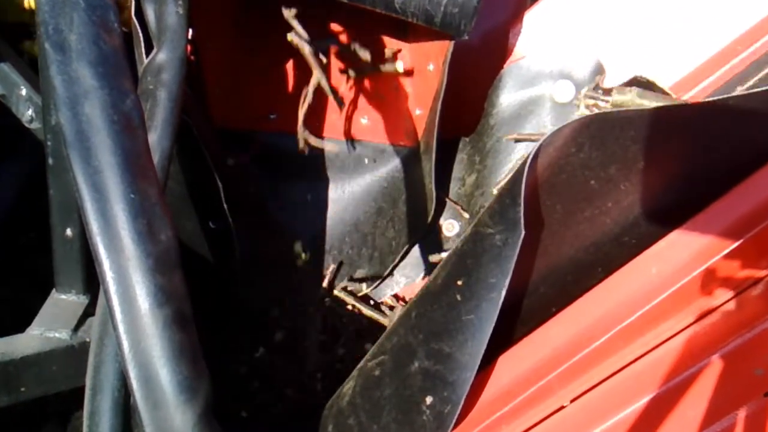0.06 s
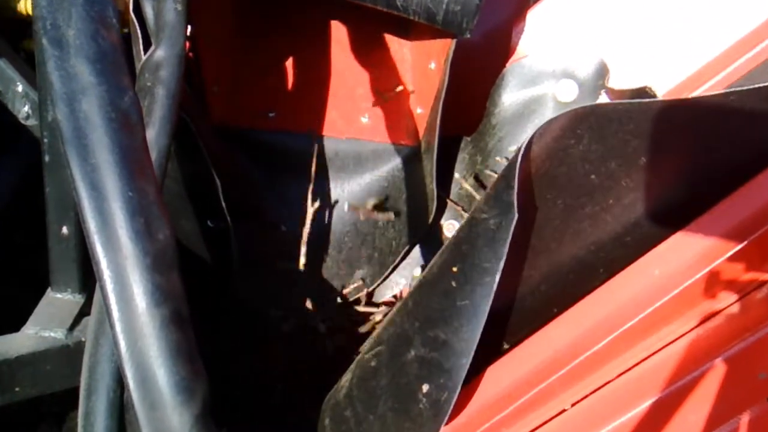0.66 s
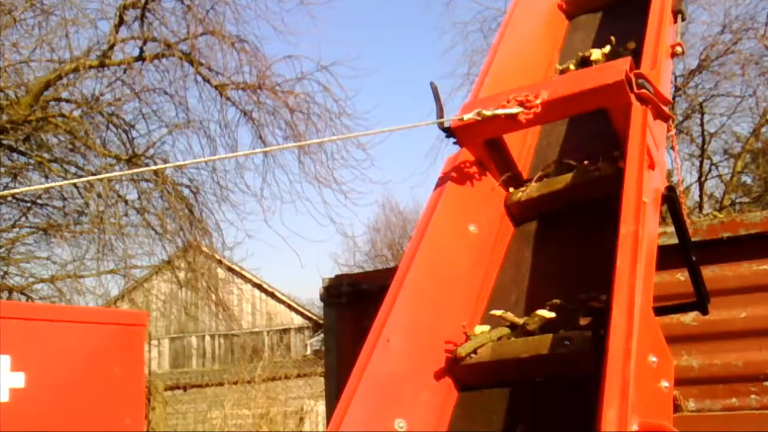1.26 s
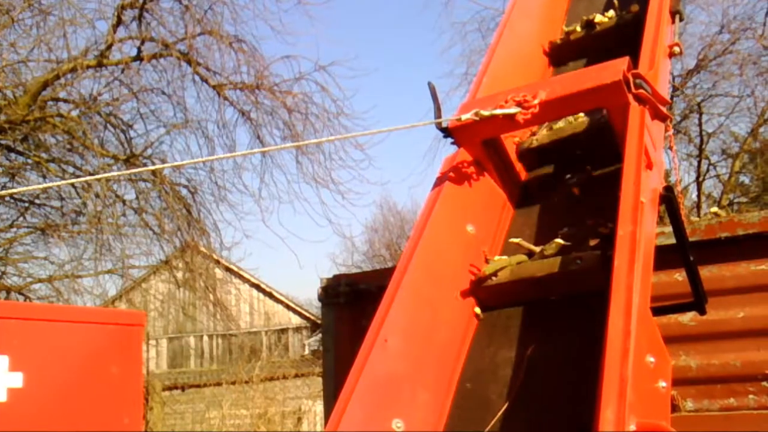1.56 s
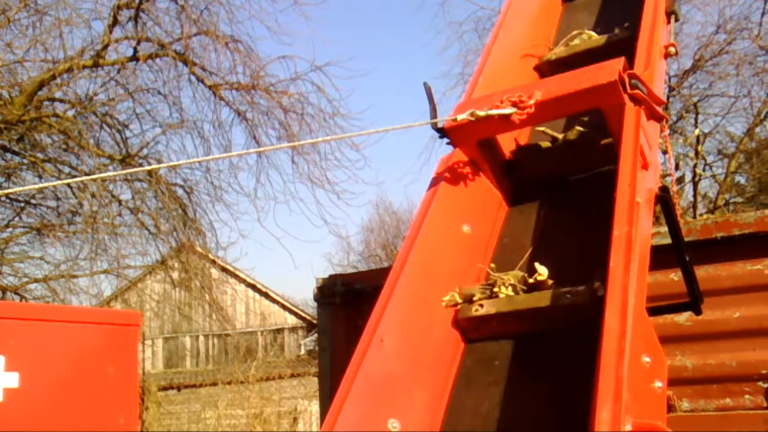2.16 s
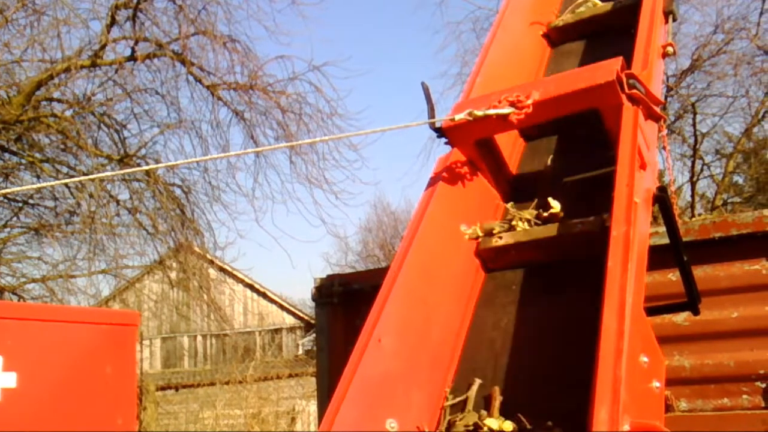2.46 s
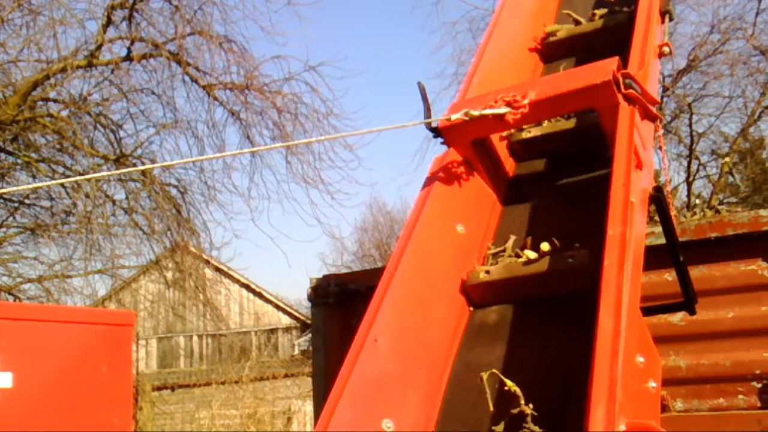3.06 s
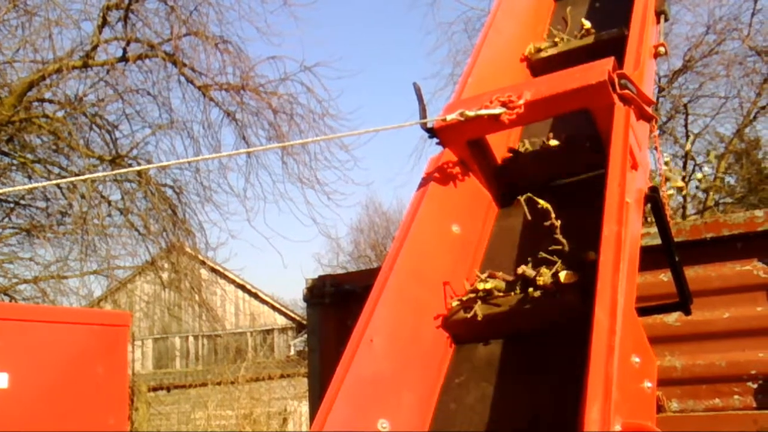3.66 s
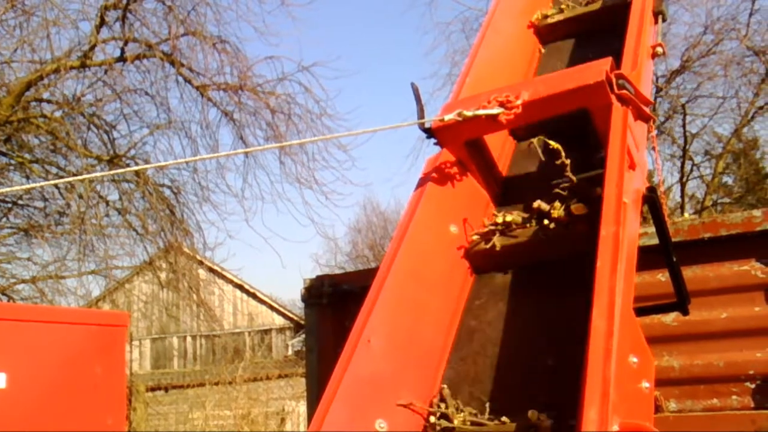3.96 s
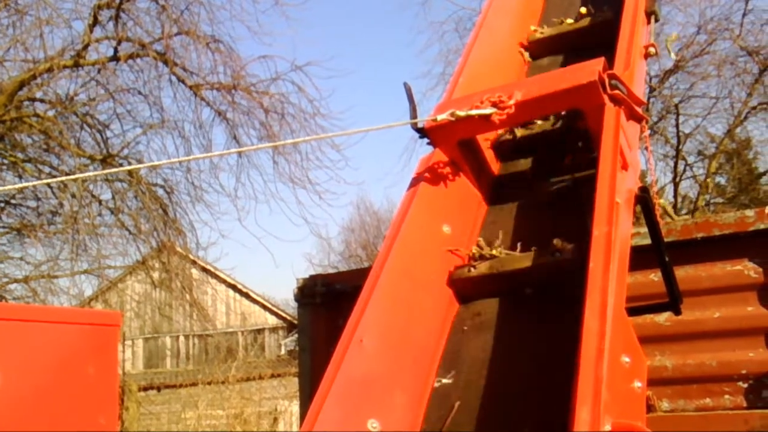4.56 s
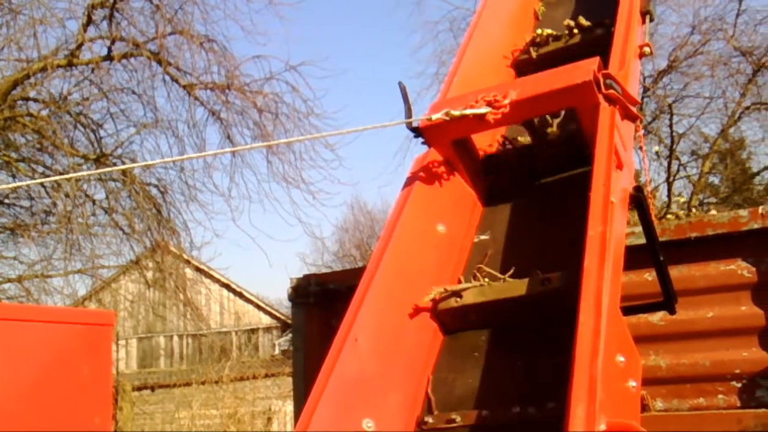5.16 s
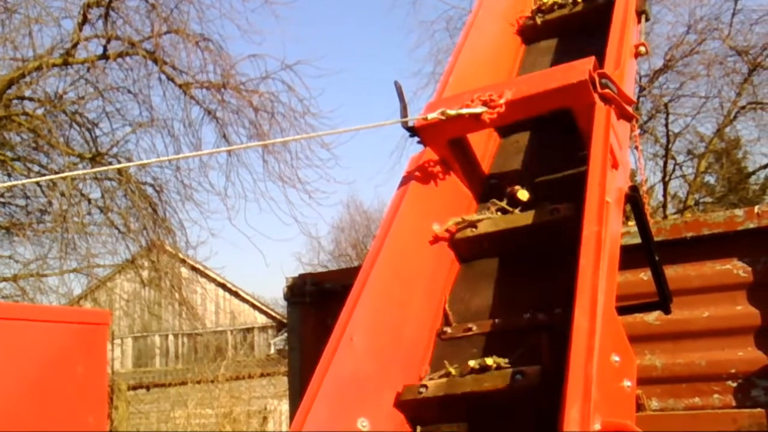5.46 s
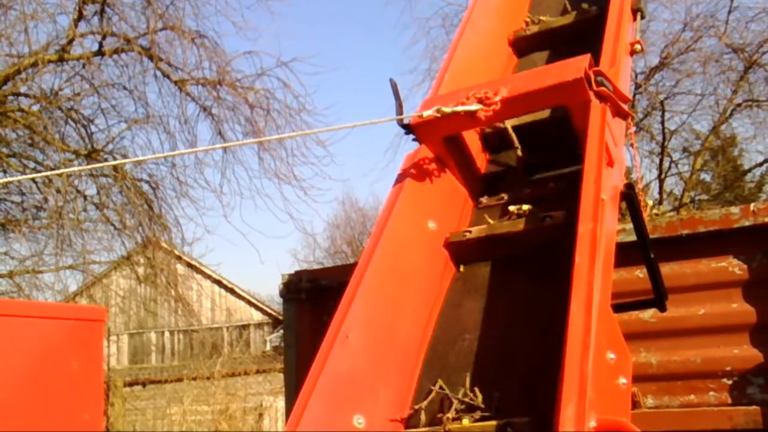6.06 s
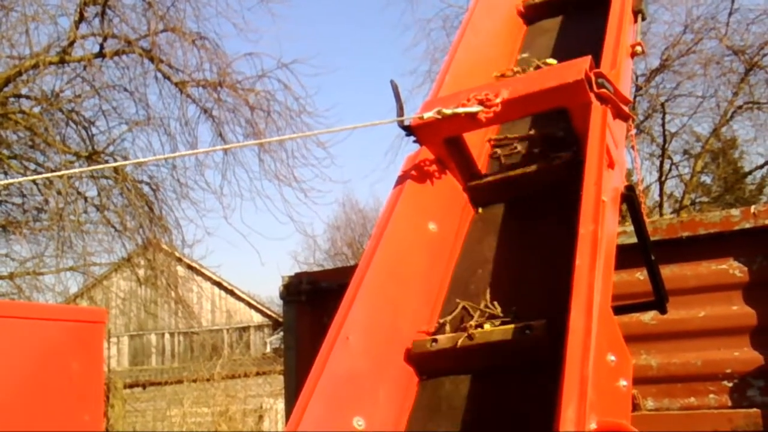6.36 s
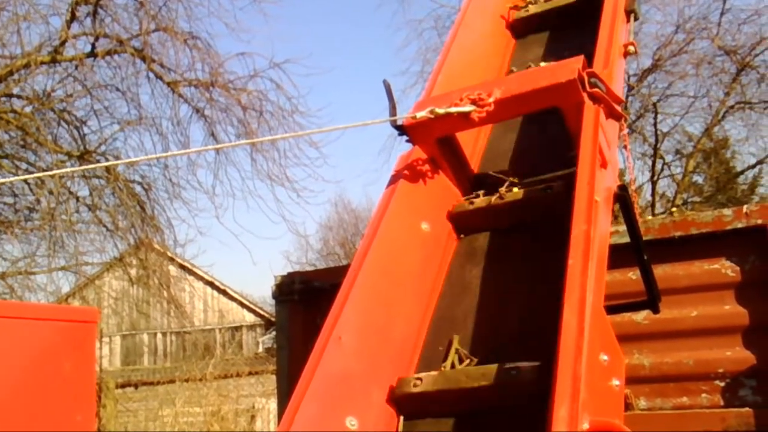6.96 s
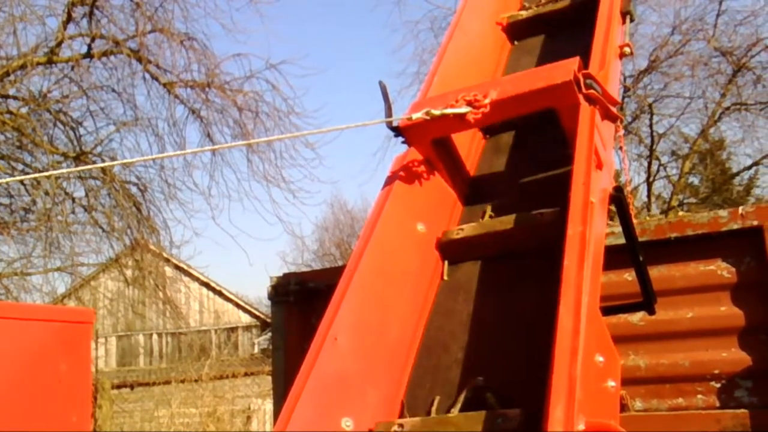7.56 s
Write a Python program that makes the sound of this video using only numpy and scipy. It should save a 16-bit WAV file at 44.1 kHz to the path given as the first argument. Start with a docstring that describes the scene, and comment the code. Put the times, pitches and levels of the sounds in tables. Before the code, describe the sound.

A diesel wood chipper chops branches with fast crunching clanks, cuts out, then fades back in with a rattling conveyor.

```python
"""A tractor's four-cylinder diesel drives a drum chipper that chops branches into billets (short logs).
For the first second we stand at the outlet. Six times a second the wood crunches, the steel cutter
clanks and billets tumble down a chute, over the drone of the engine. The sound drops out for a moment,
then fades in over about five seconds beside the rattling conveyor, where the chopping goes on.
All along, a limiter turns everything down at loud clanks, so the drone dips with them."""
import sys
import numpy as np
from scipy import signal
from scipy.fft import rfft, irfft
from scipy.io import wavfile
from scipy.ndimage import uniform_filter1d

SR = 44100
rng = np.random.default_rng(int(sys.argv[2]) if len(sys.argv) > 2 else 0)


def to_wav(s):
    """Save 16-bit WAV."""
    ch = np.atleast_2d(s).T  # columns
    pcm = np.round(np.clip(ch, -1, 1) * 32767)  # PCM
    wavfile.write(sys.argv[1], SR, pcm.astype(np.int16))


N = 344421
TIME = np.arange(N) / SR

# Levels in the tables are relative: each source sets its overall loudness in its own function.
# The branches passing through the drum. Each row: time in seconds, thickness from 0 to 1.
BRANCH_THICKNESS = [(.13, 0.62), (.29, 0.63), (.46, .2), (.63, 0.27), (.79, 0.01), (1.2, 0.13),
                    (1.55, 0.57), (1.87, 0.82), (2.37, 0.94), (2.86, 0.85), (3.36, 0.61), (4.03, 0.35),
                    (4.5, .05), (7.7, 0.1)]
# How hard the cutter clanks. Each row: time in seconds, level in dB.
CLANK_LEVELS = [(.13, -21.5), (.29, -30), (.46, -18.5), (.63, -17), (.79, -22.5), (.96, -18.5), (1.37, -30),
                (1.54, -21), (1.87, -20), (2.1, -26), (2.53, -15.5), (3.03, -19.5), (3.2, -25.5),
                (3.55, -21.5), (3.86, -18.5), (5.1, -16.5), (6.6, -16.5), (7.7, -18)]
# Knots in the wood, which make the nearest cut louder. Each entry: time in seconds.
KNOT_TIMES = [.46, .96, 1.87, 2.86, 3.69, 4.19, 5.19, 5.35, 5.85, 6.35, 6.68, 7.18, 7.34]
# Extra snaps and knocks: stray sticks that snap or hit the chute, and the branch splitting early just before
# the cuts near 1.33 s and 1.67 s. Each row: start in seconds, knock in dB, crack in dB.
EXTRA_SNAPS = [(0.045, -19.5, -49), (0.343, -31, -25), (0.374, -36, -27), (0.707, -28, -38),
               (0.946, -18, -28.5), (1.038, -24, -40), (1.294, -21, -42), (1.333, -14, -13.5),
               (1.668, -41, -14), (2.788, -20, -33), (3.098, -43, -27), (3.265, -28, -31),
               (3.759, -40, -30), (3.81, -23, -44), (4.392, -24, -41), (6.79, -34, -30),
               (6.962, -24.5, -49), (7.617, -33, -39)]
# The notes of the cutter's steel housing. Each row: pitch in Hz, level in dB, ring time in seconds.
HOUSING_NOTES = [(1034, -9, .09), (1408, -7, .09), (1803, -3, .12), (2303, -2, .06), (2390, -7, .05),
                 (2820, -12, .05), (3167, -8, .08), (3960, -11, .04)]
# Single billets that clink on the chute. Each row: start in seconds, level in dB, pitch in Hz.
BILLET_CLINKS = [(.466, -21.5, 1930), (.797, -14, 2160), (1.425, -26, 1830), (1.555, -29, 1810),
                 (1.955, -34, 1800), (2.06, -26, 1760), (2.345, -27, 1920), (3.47, -31, 2020),
                 (7.674, -16, 2130)]
# The strong engine tones. Each row: waves per engine cycle (4 is the firing rate),
# level at the outlet in dB, level by the conveyor in dB.
ENGINE_TONES = [(4, -54, -53), (8, -32, -32), (11, -42, -49.5), (12, -43, -39), (13, -39, -36.5),
                (16, -37, -27.5), (20, -39, -43.5), (26, -40, -42)]
# Panels that boom with the engine. Each row: pitch in Hz, width in Hz, boost in dB.
BOOMING_PANELS = [(232, 69, 4), (294.8, 21.5, 10), (422.3, 26.6, 9.5), (480.6, 6.5, 5.5), (642, 14, 8)]
# The tone colour of four noises. Each row: frequency in Hz, level in dB.
CRUNCH_COLOUR = [(500, -7.5), (2000, 5), (5000, 1.5), (6700, -2), (9300, -2), (10400, 7), (11300, 7.5),
                 (12300, 6), (15800, -2.5)]
CLANK_COLOUR = [(200, -22.5), (500, 5), (850, -15), (1300, -3), (2000, 0), (3200, -1.5), (4000, -3.5),
                (4500, -5), (5400, -6), (6500, -15), (9000, -18), (15000, -24)]
CLATTER_COLOUR = [(200, -23.5), (700, 5), (1100, 2.5), (1900, 2.5), (2600, 0), (3700, 0), (5000, -4.5),
                  (6200, -12.5), (8000, -22), (9300, -11), (11200, -7), (15500, -10)]
RUMBLE_COLOUR = [(20, -24.5), (40, -25), (60, -9.5), (110, -1.5), (170, 0.5), (270, -5.5), (340, -6.5),
                 (520, -7.5), (700, -14.5), (900, -30.5), (1500, -32), (4000, -40.5)]
# How alike left and right sound. Each row: frequency in Hz, likeness from 0 to 1.
STEREO_LIKENESS = [(100, 0.9), (300, 0.98), (700, 0.86), (1400, 0.78), (2800, 0.83), (5000, 0.14),
                   (9000, 0.92), (15000, 0.19)]
# How much louder the left side is. Each row: frequency in Hz, left minus right in dB.
LEFT_LOUDER = [(100, -0.5), (400, 0), (1400, 1.65), (2800, -1.1), (5000, 2.5), (8000, 4), (11000, 9.5),
               (15000, 8.5)]
# How far the left side runs ahead. Each row: frequency in Hz, lead in radians.
LEFT_LEAD = [(100, 0), (900, 0.23), (2200, 0.39), (4200, 1.09), (5600, 3.5), (8000, 4), (15000, 4)]

OUTLET_END_S, CONVEYOR_START_S, FADE_IN_S = 1.048, 1.14, 5.35
# The governor (speed control) holds the engine nearly steady, so the drum cuts on a beat.
ENGINE_RPM, SPEED_WANDER_RPM = 1007.7, 1.15
CUT_EVERY_S, CUT_JITTER_S = .16581, .0005


def plan_cuts():
    """One row a cut: start in seconds, thickness 0-1, clank in dB, billet pitch in Hz, tumble in dB."""
    at_outlet = np.arange(.130, OUTLET_END_S, CUT_EVERY_S)
    at_conveyor = np.arange(1.206, N / SR, CUT_EVERY_S)
    beat = np.r_[at_outlet, at_conveyor]
    time_luck, clank_luck, pitch_luck, tumble_luck = rng.standard_normal((4, len(beat)))
    thickness = np.clip(value_at(BRANCH_THICKNESS, beat), 0, 1)
    hits_knot = abs(beat[:, None] - KNOT_TIMES).min(axis=1) < CUT_EVERY_S / 2
    clank_db = value_at(CLANK_LEVELS, beat) + 2 * hits_knot + 0.8 * clank_luck
    # Thick billets sound lower and land harder.
    billet_hz = (2313 - 494 * thickness) * np.exp(0.0557 * pitch_luck)
    tumble_db = -32 + 2.5 * thickness + 2.5 * tumble_luck
    return np.transpose([beat + CUT_JITTER_S * time_luck, thickness, clank_db, billet_hz, tumble_db])


def cutter_clanks(cuts):
    """The cutter breaks through and chatters in its slack; the housing and the billet ring."""
    force, billet_notes, t = np.zeros(N), np.zeros(N), TIME[:SR // 4]
    for start, _, db, billet_hz, _ in cuts:
        add(force, start, amp(db) * burst(rise=0.002, hold=0.0095, fall=0.01))
        # Every billet has its own main note and four weaker ones.
        ratios = [1, *rng.uniform(.75, 1.9, 4)]
        chord = sum(size * np.sin(2 * np.pi * (billet_hz * ratio * t + rng.random()))
                    for ratio, size in zip(ratios, [0.63, 0.33, 0.23, 0.37, 0.45]))
        add(billet_notes, start, amp(db - 1) * chord * burst(rise=.002, hold=.007, fall=.007))
    for start, knock_db, _ in EXTRA_SNAPS:
        add(force, start, amp(knock_db + 0.5) * burst(rise=.001, hold=0.003, fall=0.0062))
    blows = force * tiny_impacts(per_s=3500, spread_db=-0.5)
    steel = sum(amp(db) * ring(blows, hz, ring_s) for hz, db, ring_s in HOUSING_NOTES)
    crack = coloured(wall_echoes(blows, ring_s=0.15, echo_db=-0.5), spectrum(CLANK_COLOUR))
    return by_place(outlet_db=3.5, conveyor_db=4) * (amp(-5) * crack + amp(-10) * steel + billet_notes)


def wood_crunches(cuts):
    """Fibres crack ever harder as the knife bites, then splinter, over the hiss of sliding twigs."""
    strain = by_place(outlet_db=-35, conveyor_db=-43) * amp(2.6 * drift(up_to_hz=16))  # the twigs
    bites = np.zeros(N)
    for start, thickness, clank_db, _, _ in cuts:
        # A thicker branch crunches longer and louder before the knife breaks through.
        bite_s = 0.044 * thickness + .001
        bite = burst(rise=bite_s, hold=bite_s, fall=0.018 * thickness + .001)
        add(bites, start - bite_s, amp(-19.5) * thickness * bite)
        splinter_db = clank_db - 6.5 + 2.5 * rng.standard_normal()
        add(strain, start, amp(splinter_db) * burst(rise=0.0025, hold=0.0048, fall=0.012))
    for start, _, crack_db in EXTRA_SNAPS:
        add(strain, start, amp(crack_db) * burst(rise=0.0003, hold=0.0027, fall=.005))
    jerks = amp(3.6 * drift(up_to_hz=160))  # the wood gives way unevenly
    strain += bites * by_place(outlet_db=4.5, conveyor_db=-1) * jerks
    cracks = wall_echoes(strain * tiny_impacts(per_s=2200, spread_db=2.6), ring_s=.016, echo_db=4)
    return amp(2) * coloured(cracks, spectrum(CRUNCH_COLOUR))


def chute_and_belt_clatter(cuts):
    """Billets tumble down the steel chute after each cut, while the drive and belt keep rattling."""
    tumbling = np.zeros(N)
    for start, _, _, _, tumble_db in cuts:
        add(tumbling, start + 0.0096, amp(tumble_db) * burst(rise=0.0048, hold=0.085, fall=0.025))
    knocks = (tumbling + amp(-36.5)) * tiny_impacts(per_s=520, spread_db=4)
    # Each knock sounds the note of one billet out of many lengths.
    notes_hz = np.exp(rng.uniform(np.log(1400), np.log(3700), size=24))
    billet = rng.integers(len(notes_hz), size=N)
    wood = sum(ring(knocks * (billet == k), hz, ring_s=0.048) for k, hz in enumerate(notes_hz))
    drive_level = by_place(outlet_db=-30.5, conveyor_db=-37) * amp(1.25 * drift(up_to_hz=29))
    drive = drive_level * tiny_impacts(per_s=6000, spread_db=2.5)
    chute = ring(knocks + drive, hz=1830, ring_s=0.0724)
    echoing_knocks = amp(-2.5) * wall_echoes(knocks, ring_s=0.089, echo_db=15)
    rattle = coloured(echoing_knocks + drive, spectrum(CLATTER_COLOUR))
    return rattle + amp(-7.5) * wood + amp(-14.5) * chute


def billet_clinks():
    """A billet lands end first and skitters: a short, rough knock with a pitch."""
    clinks = np.zeros(N)
    shape = burst(rise=.002, hold=.005, fall=.012)
    for start, db, hz in BILLET_CLINKS:
        rough_note = evened(ring(rng.standard_normal(len(shape)), hz, ring_s=.016))
        add(clinks, start, amp(db + 3) * shape * rough_note)
    return clinks


def engine_cycles():
    """A running count of engine cycles; each takes two turns of the crank."""
    rpm = ENGINE_RPM + SPEED_WANDER_RPM * drift(up_to_hz=1)
    return np.cumsum(rpm) / (2 * 60 * SR)


def exhaust_drone(cycles):
    """The tones of the exhaust. Uneven firing makes them waver, the high ones more."""
    unsteady = cycles + 0.0026 * drift(up_to_hz=11)
    # Unequal cylinders add weak tones among the strong ones.
    gains = {multiple: amp(-48) for multiple in range(7, 29)}
    for multiple, outlet_db, conveyor_db in ENGINE_TONES:
        gains[round(multiple)] = by_place(outlet_db, conveyor_db)
    tones = sum(gain * np.cos(2 * np.pi * (multiple * unsteady + rng.random()))
                for multiple, gain in gains.items())
    return np.sqrt(2) * tones * amp(2.14 + .5 * drift(up_to_hz=35))


def engine_rumble(cycles):
    """Burning fuel roars in four puffs a cycle and makes the panels boom."""
    hz = np.fft.rfftfreq(N, 1 / SR)
    boom_db = sum(db / (1 + (2 * (hz - centre) / width) ** 2) for centre, width, db in BOOMING_PANELS)
    puffs = rng.standard_normal(N) * (1 + 0.15 * np.cos(2 * np.pi * 4 * cycles))
    roar = coloured(puffs, spectrum(RUMBLE_COLOUR) + boom_db)
    return by_place(outlet_db=-23.5, conveyor_db=-24.5) * roar


def frame_boom():
    """The frame hums, louder under a thick branch. Each place has its own nearest panel and note."""
    def panel(hz, ring_s=0.028):
        return evened(ring(ring(rng.standard_normal(N), hz, ring_s), hz, ring_s))

    hum = np.where(TIME < CONVEYOR_START_S, panel(hz=215), panel(hz=329))
    load = amp(-12.5 * (1 - value_at(BRANCH_THICKNESS, TIME)))
    return by_place(outlet_db=-25.5, conveyor_db=-32.5) * load * hum


def wall_echoes(x, ring_s, echo_db):
    """Echoes between the steel walls smear each impact into its own dying hiss."""
    decay = amp(-120 * TIME[:SR // 4] / ring_s)
    power = abs(signal.oaconvolve(x ** 2, decay / decay.sum())[:N])
    hiss = np.sqrt(power) * rng.standard_normal(N)
    return (x + amp(echo_db) * hiss) / np.hypot(1, amp(echo_db))


def ring(x, hz, ring_s):
    """Something struck by x rings on one note, dying away by 60 dB in ring_s seconds."""
    decay, turn = 1000 ** (-1 / (ring_s * SR)), 2 * np.pi * hz / SR
    gain = np.sin(turn) * np.sqrt(2 * (1 - decay ** 2))
    return signal.lfilter([gain], [1, -2 * decay * np.cos(turn), decay ** 2], x + 1e-15)


def tiny_impacts(per_s, spread_db):
    """Clicks at random times and of uneven size, with an average power of 1."""
    size = amp(spread_db * np.minimum(rng.exponential(1, N), 4)) * rng.choice([-1, 1], N)
    return evened(size * (rng.random(N) < per_s / SR))


def burst(rise, hold, fall):
    """A loudness shape that rises, stays up until the time `hold`, then dies away (all in seconds)."""
    t = TIME[:SR // 4]
    return np.minimum(t / rise, 1) * np.exp(-np.maximum(t - hold, 0) / fall)


def drift(up_to_hz):
    """A smooth random wobble with an average power of 1."""
    slow = np.fft.rfftfreq(N, 1 / SR) < up_to_hz
    return evened(irfft(rfft(rng.standard_normal(N)) * slow, N))


def coloured(x, db):
    """Gives x a tone colour; white noise keeps its overall power."""
    cepstrum = irfft(np.log(evened(amp(db))), N)
    # Folding this onto its first half makes the filter ring after a click, never before it.
    cepstrum[1:N // 2] *= 2
    cepstrum[N // 2 + 1:] = 0
    return irfft(rfft(x) * np.exp(rfft(cepstrum)), N)


def spectrum(table):
    """Joins the rows of a table into a curve over all frequencies."""
    hz, value = np.transpose(table)
    return np.interp(np.log(np.fft.rfftfreq(N, 1 / SR) + 1), np.log(hz), value)


def value_at(table, seconds):
    """Reads between the rows of a table at the given time."""
    return np.interp(seconds, *np.transpose(table))


def by_place(outlet_db, conveyor_db):
    """One gain while we stand at the outlet, then another by the conveyor."""
    return np.where(TIME < CONVEYOR_START_S, amp(outlet_db), amp(conveyor_db))


def add(mix, start, sound):
    """Mixes a sound in at `start` seconds."""
    part = mix[max(round(start * SR), 0):][:len(sound)]
    part += sound[:len(part)]


def amp(db):
    """Turns decibels into a number to multiply by."""
    return 10 ** (np.asarray(db) / 20)


def evened(x):
    """Scales x to an average power of 1."""
    return x / np.sqrt(np.mean(x ** 2) + 1e-20)


def limiter(x, threshold_db, recovery_db_per_s, strength):
    """Turns the sound down at once on a peak in the louder side, then lets it creep back."""
    treble_boosted = x - 0.19 * np.diff(x, 2, prepend=0, append=0)  # it reacts more to high sounds
    power = abs(uniform_filter1d(treble_boosted ** 2, size=130)).max(0)
    recovery_db = TIME * recovery_db_per_s
    peak_db = np.maximum.accumulate(10 * np.log10(power + 1e-12) + recovery_db) - recovery_db
    over_db = np.maximum(peak_db - threshold_db, 0)
    return x * amp(-strength * uniform_filter1d(over_db, size=130))


def scene():
    """Mixes the machine in stereo: direct sound reaches both sides, scattered sound differs."""
    cycles, cuts = engine_cycles(), plan_cuts()
    left, scattered = (engine_rumble(cycles) + chute_and_belt_clatter(cuts)
                       + cutter_clanks(cuts) + wood_crunches(cuts) for _ in range(2))
    likeness = np.clip(spectrum(STEREO_LIKENESS), 0, 1)
    blend = likeness * rfft(left) + np.sqrt(1 - likeness ** 2) * rfft(scattered)
    right = irfft(blend * amp(-spectrum(LEFT_LOUDER)) * np.exp(-1j * spectrum(LEFT_LEAD)), N)
    near_centre = exhaust_drone(cycles) + frame_boom() + billet_clinks()
    return np.array([left, right]) + near_centre * amp([[.3], [-.3]])


def record(dry):
    """Limits the peaks, drops out and fades back in between the two places, and cuts the top treble."""
    limited = amp(0.73) * limiter(dry, threshold_db=-21, recovery_db_per_s=61.5, strength=0.88)
    drop_out = np.exp(-np.maximum(TIME - OUTLET_END_S, 0) / 0.0034)
    fade_in = np.clip((TIME - CONVEYOR_START_S) / FADE_IN_S, 0, 1) ** .82
    faded = limited * (drop_out + fade_in + amp(-56))
    low_pass = signal.firwin(511, cutoff=15900, window=("kaiser", 9), fs=SR)
    return signal.oaconvolve(faded, low_pass[None], "same")


dry = scene()
out = record(dry)
to_wav(out)
```